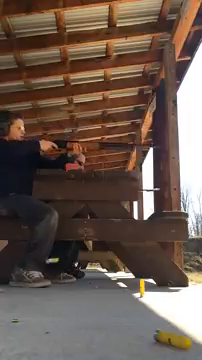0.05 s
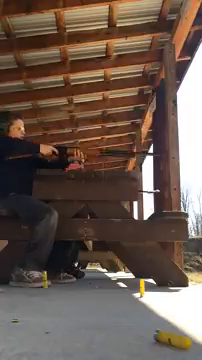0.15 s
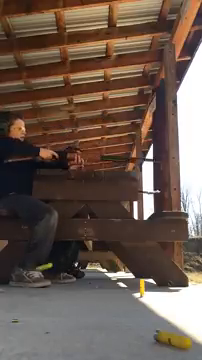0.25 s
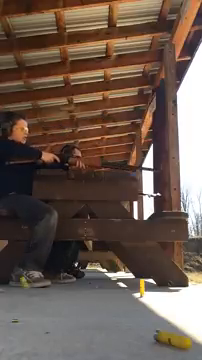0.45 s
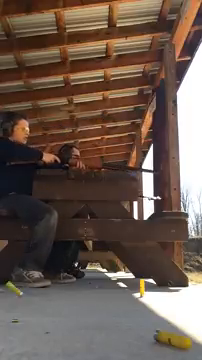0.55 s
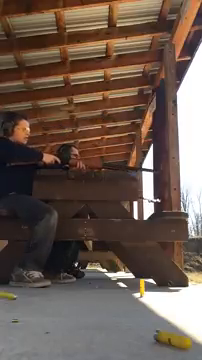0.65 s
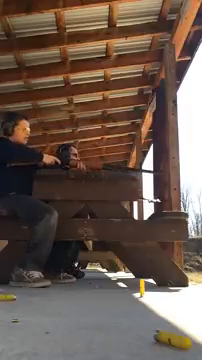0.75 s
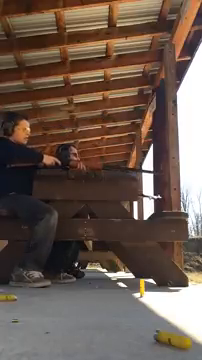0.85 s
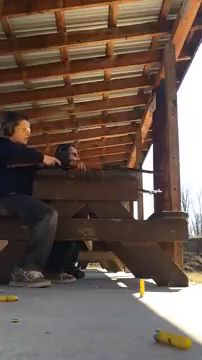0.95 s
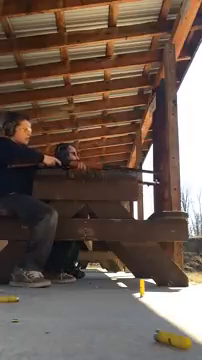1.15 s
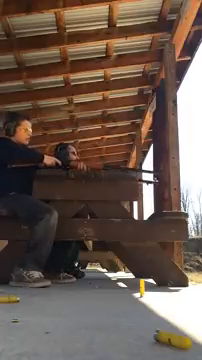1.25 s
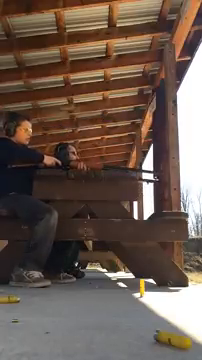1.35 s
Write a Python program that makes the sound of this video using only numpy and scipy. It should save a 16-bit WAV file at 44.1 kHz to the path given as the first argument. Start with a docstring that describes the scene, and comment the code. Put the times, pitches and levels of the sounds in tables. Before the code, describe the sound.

A spent shotgun shell drops on concrete under an open shelter, cracking brightly, then bouncing ever faster with short hollow rings and ending in faint ticks. A few soft thumps and a low rumble lie underneath.

```python
"""A dropped shotgun shell

An empty shell falls on concrete under a timber roof, bounces ever faster on its brass head and
plastic rim, and rolls. Each contact cracks, clacks and rings the air in the shell, a tube closed at
one end. Dull thumps, a low outdoor rumble, a hum and a fading wash of noise lie underneath."""
import sys
import numpy as np
from scipy import signal
from scipy.fft import rfft, irfft, next_fast_len
from scipy.io import wavfile
from scipy.ndimage import map_coordinates

SR = 44100
rng = np.random.default_rng(int(sys.argv[2]) if len(sys.argv) > 2 else 0)


def dump_mix(stems):
    """Bounce the given channels to the path in sys.argv[1] as a 16-bit WAV at rate SR."""
    frames = np.atleast_2d(stems).T  # one column per channel
    limited = np.clip(frames, -1, 1)  # hard clip at full scale
    pcm = np.round(limited * 32767).astype(np.int16)
    wavfile.write(sys.argv[1], SR, pcm)


N = 61739

# A "colour" says how strong each frequency is. A "fade time" is how long a sound takes to drop 60 dB.
# low outdoor rumble: (frequency [Hz], level [dB])
RUMBLE_COLOUR = [(25, -27), (42, -9), (60, 1), (85, -4), (130, -8), (240, -13.5), (380, -12), (560, -17.5),
                 (1400, -20), (2400, -33.5), (3700, -38.5), (7000, -42.5), (15000, -52.5)]
# mid-range wash of noise: (frequency [Hz], level [dB])
WASH_COLOUR = [(100, -29), (250, -14.5), (480, 2.5), (800, -6.5), (1700, -5), (2600, -16.5), (4000, -29),
               (8000, -53.5)]
# how the wash swells and dies away: (time [s], level [dB])
WASH_LEVELS = [(0, -42.5), (.12, -48), (.16, -39.5), (.25, -43), (.35, -51.5), (.45, -52.5), (.9, -58.5),
               (1.4, -68)]
# dull thumps: (time [s], level [dB], rise time [s], fade time [s], treble cutoff [Hz])
THUMP_EVENTS = [(0.206, -33, 0.0024, 0.041, 890), (0.646, -32.5, .014, 0.18, 207),
                (0.892, -29.5, 0.0158, 0.18, 285)]
# the deep tone of a thump: (frequency [Hz], level [dB])
DULL_COLOUR = [(40, -23), (90, -4), (180, 0), (300, -5.5), (450, -3.5), (900, -7), (2500, -19.5)]
# how long the echo from roof and benches lasts: (frequency [Hz], fade time [s])
ECHO_FADES = [(400, .3), (1400, .26), (4100, .215), (6500, .16), (10000, .148), (15000, .135)]
# the tone of that echo: (frequency [Hz], level [dB])
ECHO_COLOUR = [(300, -3), (1400, -6), (2500, 7), (4100, 3.5), (6500, 4.5), (10000, 3), (15000, -3)]
# hard crack on concrete: (frequency [Hz], level [dB])
CRACK_COLOUR = [(150, -32.5), (500, -25.5), (1000, -20), (2300, -24.5), (3200, -16), (4100, -8), (4900, -6),
                (6000, 1), (7700, -1), (9500, 2.5), (13200, 5), (15000, 0.5)]
# clack of the plastic wall: (frequency [Hz], level [dB])
CLACK_COLOUR = [(200, -30.5), (650, -20.5), (1000, -8.5), (1750, 4), (2100, -5.5), (2400, -5.5), (3700, -5),
                (5000, -19), (12000, -26)]
# the three notes of the air in the shell, lowest first: (fade time [s], phase wobble [rad])
AIR_NOTES = [(.028, 0.26), (0.035, .6), (.022, 0.98)]
# each time the shell touches the floor: (time [s], first note [dB], second note [dB], third note [dB],
# third note's pitch [Hz], crack [dB], crack's treble cutoff [Hz], clack [dB], echo gain [dB])
FLOOR_CONTACTS = [(0.208, -30, -23, -20, 6750, -9.5, 16000, -30, -6),
                  (0.2128, -41.5, -47, -16, 6700, -3.5, 15000, -37, -3),
                  (0.2203, -37, -14, -32, 6160, -25, 9100, -29.5, -12.5),
                  (.2270, -28, -13.5, -4, 6640, -9, 8000, -37, -12),
                  (0.4861, -25, -11, -17, 7050, -10, 8330, -31, -10),
                  (0.4886, -7, -12.5, -15, 6160, -15.5, 5070, -28, -9.5),
                  (0.632, -33, -30, -21.5, 7220, -26, 12400, -29.5, -5),
                  (.6355, -8, -17.5, -14.5, 6880, -23, 9700, -18, -17.5),
                  (0.7084, -20.5, -31, -32.5, 6820, -30, 8300, -31.5, -8),
                  (0.738, -27.5, -32, -25, 6700, -27.5, 13600, -30, -22),
                  (.7440, -26, -23.5, -39, 6770, -31.5, 6960, -48, -4.5),
                  (0.7861, -43, -28, -24.5, 6850, -28.5, 8500, -44, -7.5),
                  (0.826, -25.5, -37, -55, 7000, -45, 5960, -44, -17),
                  (0.844, -32.5, -53, -63, 6700, -65, 6000, -60, -3),
                  (0.8904, -30, -65, -37, 6370, -37, 11270, -42, -11),
                  (0.908, -32.5, -57, -59.5, 6900, -57.5, 8000, -45, -16),
                  (.9300, -41, -45.5, -51.5, 6840, -44, 15000, -46, -10),
                  (.9620, -37, -59.5, -48, 6690, -54.5, 10000, -62, -8),
                  (1.147, -61, -51, -55, 6800, -60.5, 7000, -69, -10),
                  (1.3109, -64, -55.5, -56, 6930, -63.5, 7030, -68.5, -5.5)]


def gain(db):
    """Turns decibels into a number to multiply by."""
    return 10 ** (np.asarray(db) / 20)


def normalised(x):
    """Scales a signal to an average strength (rms) of 1."""
    return x / np.sqrt(np.mean(x ** 2) + 1e-20)


def look_up(table, hz):
    """Reads between the rows of a (frequency, value) table, on a logarithmic frequency scale."""
    frequencies, values = np.transpose(table)
    return np.interp(np.log(hz + 1), np.log(frequencies + 1), values)


def filtered(x, response):
    """Multiplies each frequency in x by response(frequency)."""
    size = next_fast_len(len(x) + 8192)
    hz = np.fft.rfftfreq(size, 1 / SR)
    return irfft(rfft(x, size) * response(hz), size)[:len(x)]


def noise(colour, cutoff_hz=SR, steepness=2):
    """Noise of strength 1 with the given colour, growing weaker above the cutoff."""
    def response(hz):
        return gain(look_up(colour, hz)) / np.sqrt(1 + (hz / cutoff_hz) ** (2 * steepness))
    return normalised(filtered(rng.standard_normal(N), response))


def wobble(rate):
    """A smooth curve that passes through `rate` random values a second."""
    return map_coordinates(rng.standard_normal(N // 10), [np.arange(N) * rate / SR], mode="wrap")


def since(start):
    """Seconds since the start time, zero before it."""
    return np.maximum(np.arange(N) / SR - start, 0)


def fade(t, fade_s):
    """Falls from 1 to a thousandth (60 dB down) in fade_s seconds."""
    return np.exp(-np.log(1000) * t / fade_s)


def struck(t, rise_s, fade_s):
    """The loudness of something hit: a quick rise, then a fade."""
    return (1 - np.exp(-t / rise_s)) * fade(t, fade_s)


def outdoors(rumble_db=-47.5, hum_hz=59, hum_db=-59):
    """A steady rumble, a low wavering hum and a wash of noise that dies away."""
    t = since(0)
    rumble = gain(rumble_db) * noise(RUMBLE_COLOUR)
    hum = np.sin(2 * np.pi * hum_hz * t + 0.8 * wobble(7))
    hum *= gain(2.5 * wobble(4.4))  # the loudness wavers too
    wash_db = np.interp(t, *np.transpose(WASH_LEVELS))
    wash = gain(wash_db) * noise(WASH_COLOUR)
    return rumble + gain(hum_db) * normalised(hum) + wash


def thumps():
    """Three soft, low knocks that swell briefly and die."""
    out = np.zeros(N)
    for start, db, rise_s, fade_s, cutoff_hz in THUMP_EVENTS:
        swell = np.minimum(since(start) / rise_s, 1)
        loudness = gain(db) * swell * fade(since(start + rise_s), fade_s)
        out += loudness * noise(DULL_COLOUR, cutoff_hz)
    return out


def roof_echo(sound, delay_s=0.0059, rise_s=0.0023):
    """Roof and benches throw the sound back as a blurred tail whose treble dies first."""
    hz, t, bands = signal.stft(rng.standard_normal(SR // 2), SR, nperseg=256)
    age = np.maximum(t - delay_s, 0)
    bands *= struck(age, rise_s, look_up(ECHO_FADES, hz)[:, None])  # each band fades at its own speed
    _, tail = signal.istft(bands, SR)
    tail = filtered(tail / np.linalg.norm(tail), lambda f: gain(look_up(ECHO_COLOUR, f)))
    return signal.fftconvolve(sound, tail)[:N]


def concrete_crack(t, cutoff_hz):
    """Hitting hard concrete makes a short, bright burst of noise."""
    return struck(t, rise_s=0.0022, fade_s=0.025) * noise(CRACK_COLOUR, cutoff_hz, steepness=4.1)


def plastic_clack(t):
    """The plastic wall answers with a duller, slightly longer burst."""
    return struck(t, rise_s=0.0022, fade_s=0.035) * noise(CLACK_COLOUR)


def air_ring(t, levels_db, third_hz, first_hz=1388, second_hz=4089):
    """Air in a tube closed at one end rings at about 1, 3 and 5 times its lowest pitch."""
    ring = np.zeros(N)
    for hz, db, (fade_s, roughness) in zip((first_hz, second_hz, third_hz), levels_db, AIR_NOTES):
        pitch_hz = hz * (1 + 0.0061 * rng.standard_normal())  # slightly off on every hit
        phase = 2 * np.pi * pitch_hz * t + roughness * wobble(890)  # a fast wobble roughens the note
        ring += gain(db) * struck(t, rise_s=0.001, fade_s=fade_s) * np.sin(phase)
    return ring


def bouncing_shell():
    """Each contact cracks, clacks, rings and echoes; how the shell lands sets the share of each."""
    out = np.zeros(N)
    for start, *notes_db, third_hz, crack_db, cutoff_hz, clack_db, echo_db in FLOOR_CONTACTS:
        t = since(start)
        hit = gain(crack_db) * concrete_crack(t, cutoff_hz)
        hit += gain(clack_db) * plastic_clack(t)
        hit += air_ring(t, notes_db, third_hz)
        out += hit + gain(echo_db) * roof_echo(hit)
    return out


def scene():
    """The shell, the thumps and the outdoor background, added into one channel."""
    return (bouncing_shell() + thumps() + outdoors())[None]


def record(dry):
    """Cuts off the very highest treble sharply."""
    cutoff_hz = 15250
    return np.array([filtered(x, lambda hz: 1 / np.sqrt(1 + (hz / cutoff_hz) ** 300)) for x in dry])


dry = scene()
out = record(dry)
dump_mix(out)
```